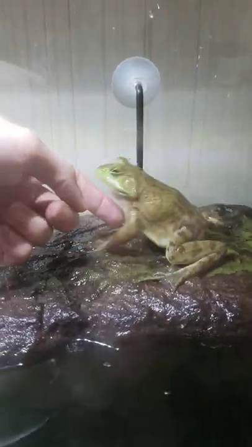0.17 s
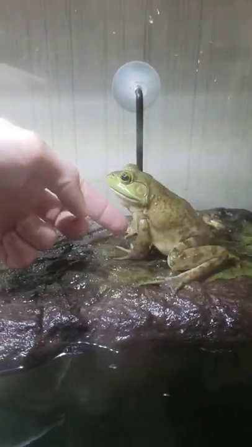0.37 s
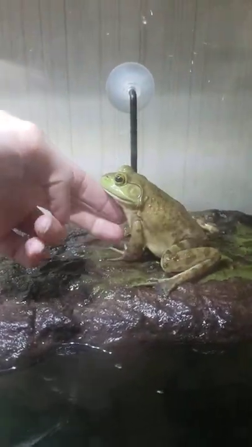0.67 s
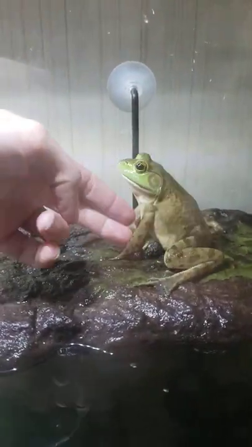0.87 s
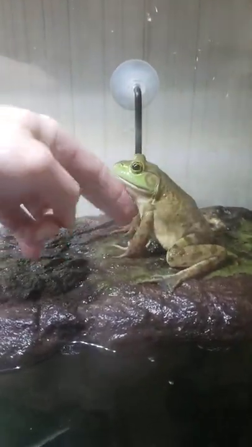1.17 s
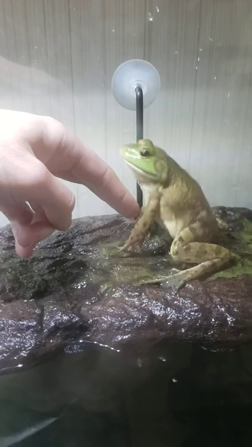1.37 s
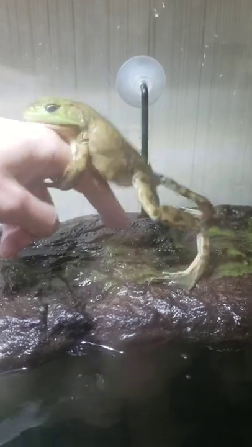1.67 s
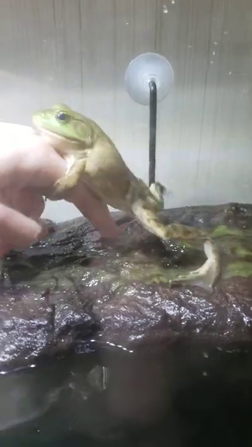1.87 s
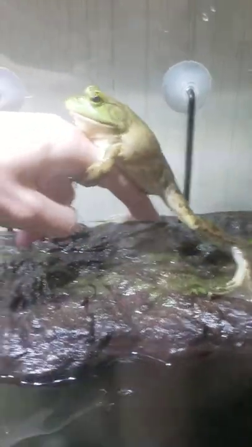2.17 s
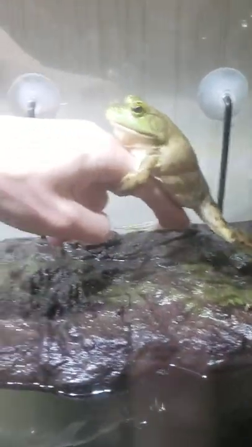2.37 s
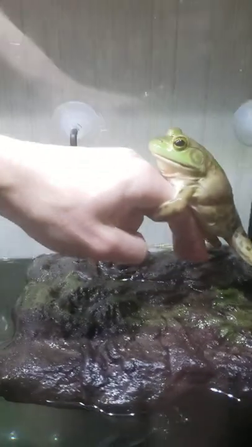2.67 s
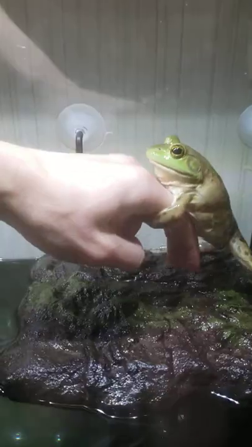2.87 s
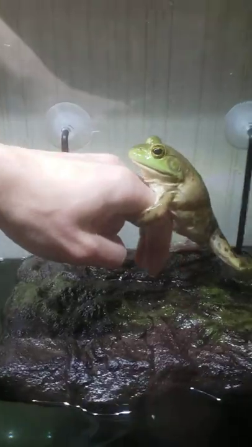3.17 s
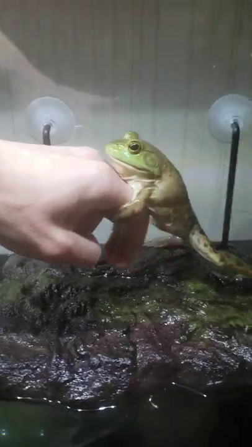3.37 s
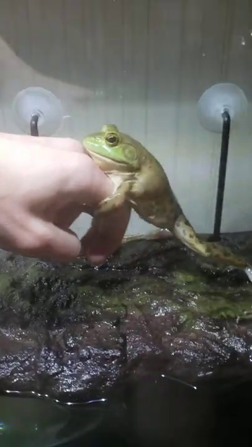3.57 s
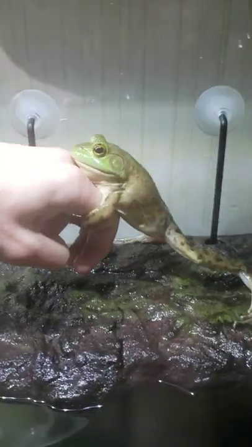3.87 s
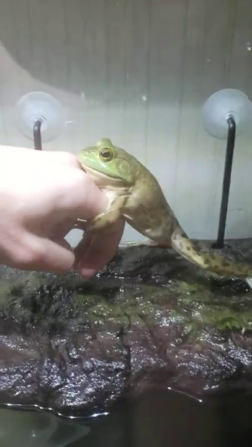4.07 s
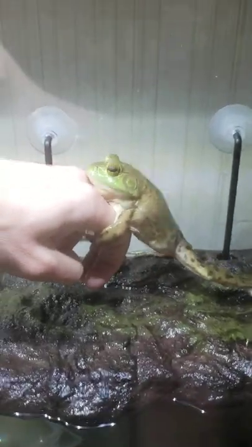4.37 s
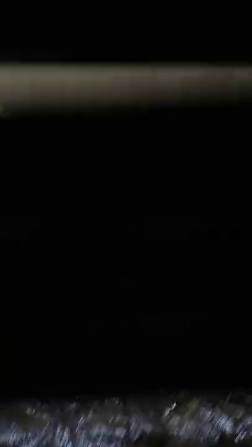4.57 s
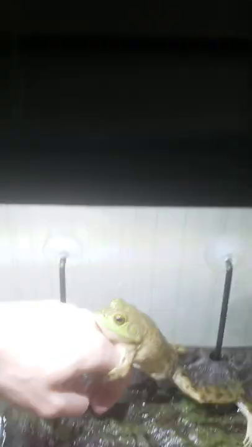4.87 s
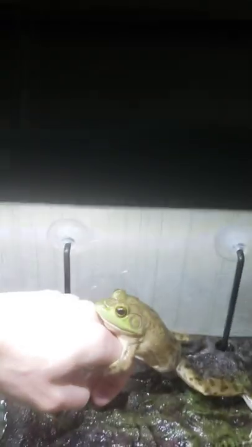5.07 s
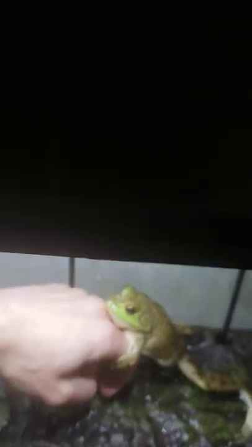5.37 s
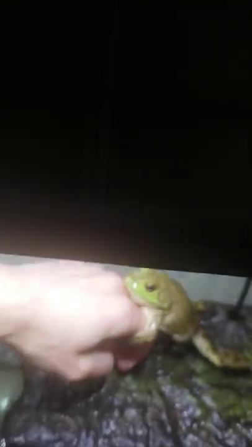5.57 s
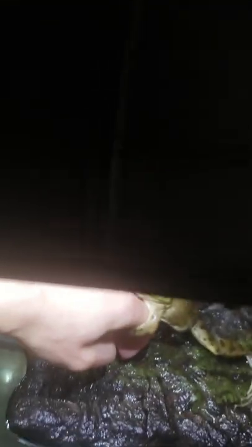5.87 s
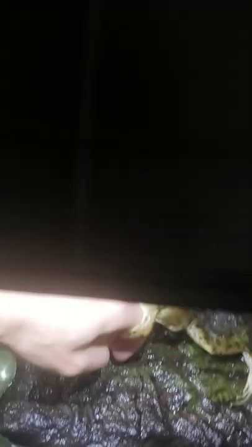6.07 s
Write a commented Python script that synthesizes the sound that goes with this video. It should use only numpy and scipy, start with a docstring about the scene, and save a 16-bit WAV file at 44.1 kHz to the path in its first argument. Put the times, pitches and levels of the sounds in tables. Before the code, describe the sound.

Over low tank hum, wet skin smacks softly, a frog barks one loud pitched croak, then rattles in stuttering runs until the end.

```python
"""Bullfrog in a glass tank

A bullfrog lifted on a hand gives one short, loud croak: unsteady cord pulses and puffs through a throat.
A long buzzing rattle of single pops follows, crisper as the microphone rises past the tank's rim.
Wet skin smacks, brushes and squeaks as shaped noise; bumps ring low modes and a drop blips.
A pump hums in wavering sines, over rumble, thin hiss and a high whine, in a small live room.
"""
import sys
import numpy as np
from scipy import signal
from scipy.fft import rfft, irfft
from scipy.io import wavfile

SR = 44100
rng = np.random.default_rng(int(sys.argv[2]) if len(sys.argv) > 2 else 0)


def to_wav(s):
    """Save 16-bit WAV."""
    ch = np.atleast_2d(s).T  # columns
    pcm = np.round(np.clip(ch, -1, 1) * 32767)  # PCM
    wavfile.write(sys.argv[1], SR, pcm.astype(np.int16))


N = 273684


def croak(jitter=0.064, puff_gain=8.2, source_tilt=0.28, rasp_hz=1900, ear_lag_s=0.000095):
    """Fast, unsteady pulses of the vocal cords and puffs of air sound through the throat."""
    # a hard push keeps the croak clean; it frays as the air runs out and ends in a soft hoot:
    # start_s, effort_db, roughness (0-1), rasp_db
    course = [(1.923, -47.5, 0.3, 0.5), (1.945, -42, 0.3, -1), (1.959, -25.5, 0, 1), (1.97, -34, .28, 1.5),
              (1.981, -27, 0.2, 4.5), (1.998, -20, 0.07, 0), (2.016, -30.5, 0.37, 3.5),
              (2.05, -28.5, 0.28, -5.5), (2.075, -33, .45, -4), (2.096, -49, 0.53, -9),
              (2.116, -35, 0.19, -9), (2.187, -43, .06, -19), (2.215, -61, 0.2, -22)]
    # the pitch scoops up as the cords tighten, then holds: start_s, pitch_hz
    pitch = [(1.923, 428), (1.95, 456), (2.0, 482), (2.11, 482), (2.21, 474)]
    # throat resonances: frequency_hz, gain_db
    throat = [(150, -15), (330, -9), (465, 7.5), (600, -12), (800, -3), (970, 7), (1150, -6.5), (1420, -4),
              (1640, -9), (2100, -8.5), (2340, -5.5), (2600, -18), (3200, -26.5), (3700, -34), (4900, -40),
              (6200, -29), (7700, -38.5), (9000, -91)]
    # the bass comes straight, the treble by way of the walls: frequency_hz, direct_db, room_db
    paths = [(486, -1.5, -10.5), (950, -4.5, -9), (1630, -13.5, -1)]
    # stereo balance: frequency_hz, left_minus_right_db
    balance = [(480, 0.5), (960, 4.5), (1400, 1.5), (2200, -2.5), (4000, -9.5), (7000, 8.5)]
    tighten_s = 0.047
    # the octave rings out when tight cords are pushed hard
    octave_slack_db, octave_full_db = -12.5, 5.5

    s, *controls = np.transpose(course)
    t = np.arange(0, s[-1] - s[0], 1 / SR)
    effort_db, rough, rasp_db = (np.interp(s[0] + t, s, control) for control in controls)
    hz = np.interp(s[0] + t, *np.transpose(pitch))
    turns = np.cumsum(hz * (1 + jitter * rough * wander(len(t), 200))) / SR

    tension = np.sin(np.pi / 2 * np.minimum(t / tighten_s, 1)) ** 2
    push = np.sqrt(amp(effort_db - effort_db.max()))
    octave = amp(octave_slack_db + (octave_full_db - octave_slack_db) * tension * push)
    cords = np.zeros(len(t))
    for k in range(1, 16):
        harmonic = np.sin(2 * np.pi * k * turns) / k ** source_tilt
        cords += (octave if k == 2 else 1) * harmonic

    # each cycle starts with the strongest breath
    puffs = unit((0.25 + np.exp(-(turns % 1) / 0.6)) * rng.standard_normal(len(t)))
    voice = unit(colour(unit(cords) + puff_gain * rough * puffs, throat))
    rasp = signal.sosfiltfilt(signal.butter(3, rasp_hz, "high", fs=SR, output="sos"), voice)
    edges = signal.windows.tukey(len(t), .05)
    call = edges * amp(effort_db) * (voice + (amp(rasp_db) - 1) * rasp)

    # the direct sound reaches the right ear first
    dry = np.zeros((2, N))
    add(dry[0], s[0] + ear_lag_s, call)
    add(dry[1], s[0], call)
    direct = colour(dry, [(f, db) for f, db, _ in paths])
    scattered = room(colour(dry[0], [(f, db) for f, _, db in paths]))
    heard = direct + scattered + glass(dry[0])
    return irfft(rfft(heard) * sides(read(balance, np.fft.rfftfreq(N, 1 / SR))), N)


def glass(x):
    """The ringing between the glass walls; the two ears catch each resonance a quarter cycle apart."""
    # what the croak leaves ringing: frequency_hz, t60_s, gain_db
    resonances = [(440, 0.2, 2.5), (909, .3, 3), (1333, 0.13, 9.5), (1483.5, .35, 13), (2310, 0.34, 3)]
    t = np.arange(SR // 2) / SR
    modes = np.zeros(len(t), complex)
    for hz, t60, db in resonances:
        # makes db the gain at the resonance, however long it rings
        scale = 2 * np.log(1000) / (t60 * SR)
        modes += amp(db - 60 * t / t60) * scale * np.exp(2j * np.pi * hz * t)
    return convolve(x, np.array([modes.real, modes.imag]))


def rattle(slip_s=0.00028, uneven_db=2.02, pulse_hz=660, pulse_s=0.00093, pan_db=7, room_db=-8.0,
           ring_db=-13.0, room_pan_db=3, treble_hz=2200, rasp_db=-75, rasp_s=0.0055):
    """Slack cords pop open one pulse at a time, in runs with short hitches between them."""
    # unbroken runs: first_pulse_s, last_pulse_s, push_db
    runs = [(3.481, 3.54, -38), (3.57, 3.604, -35), (3.635, 3.726, -39.5), (3.776, 3.913, -35),
            (3.959, 4.107, -37.5), (4.151, 4.299, -36), (4.345, 4.493, -35), (4.54, 4.747, -35.5),
            (4.787, 4.874, -36.5), (4.906, 4.941, -33), (4.989, 5.021, -31), (5.071, 5.131, -31.5),
            (5.191, 5.191, -30), (5.275, 5.308, -31.5), (5.357, 5.512, -32.5), (5.54, 5.715, -32),
            (5.774, 5.774, -30.5), (5.825, 5.94, -31.5), (5.954, 6.012, -34), (6.037, 6.186, -32)]
    # the pops as tank and room scatter them: frequency_hz, gain_db
    scatter_colour = [(120, -30.5), (300, -33.5), (450, 6), (570, 4.5), (780, -3.5), (970, -9.5),
                      (1130, -14), (1400, -14.5), (1700, -17), (2000, -19), (2700, -12), (5000, -52),
                      (7600, -18.5), (11000, -36.5)]
    # the rasp of a single pop: frequency_hz, gain_db
    pop_rasp = [(700, -9), (1400, 13), (2700, -1.5), (4300, -11), (9500, -28)]
    # nearby hard surfaces: delay_s, left_gain, right_gain
    reflections = [(.0048, -0.092, -0.16), (.0067, -0.38, 0.06), (.0126, 0.52, 0.0036), (.017, 0.47, -0.18)]
    # standing waves the pops keep ringing: frequency_hz, t60_s, mic_low_db, mic_high_db
    standing_waves = [(586, 1, -7, 6.5), (638, 0.36, 9, -18), (733, 0.38, 3.5, -4), (930, 0.41, 3, 4.5),
                      (1010.5, 0.84, -3, -1), (1173, 0.22, -12, -35), (1350, 0.096, -12, -49),
                      (1680, 0.2, -22, -19.5), (2565, 0.057, -23, -38)]
    # the direct path opens up as the microphone clears the rim: start_s, level_db
    direct_path = [(3.5, -11.5), (4.6, -7.5), (4.95, -4.5), (6.2, 1)]
    pulses_per_s, run_swell_db = 33, 0.8  # the push swells in the middle of each run
    treble_low_db, treble_high_db = -14, -5.5  # microphone low and high

    pops = np.zeros(N)
    for first, last, run_db in runs:
        times = np.linspace(first, last, round((last - first) * pulses_per_s) + 1)
        push_db = run_db + run_swell_db * np.sin(np.linspace(0, np.pi, len(times)))
        chance = rng.standard_normal((len(times), 2))
        for s, db, (slip, size) in zip(times, push_db, chance):
            add(pops, s + slip_s * slip, amp([db + uneven_db * size]))

    # each pop is a smooth swing of barely two cycles
    u = np.arange(-256, 257) / SR
    pulse = -np.exp(-.5 * (u / pulse_s) ** 2) * np.sin(2 * np.pi * pulse_hz * u)
    direct = signal.fftconvolve(pops, pulse, "same")
    opening = amp(np.interp(np.arange(N) / SR, *np.transpose(direct_path)))
    out = sides(pan_db) * direct * opening
    for delay, left, right in reflections:
        add(out, delay, np.array([[left], [right]]) * direct)

    scattered = convolve(pops, ring(scatter_colour))[0]
    t = np.arange(SR // 2) / SR
    waves = 0
    for hz, t60, low_db, high_db in standing_waves:
        mode = np.exp(-np.log(1000) * t / t60) * np.sin(2 * np.pi * hz * t)
        waves = waves + lifted(low_db, high_db, bend=0.72) * unit(convolve(pops, mode))
    waves = np.std(scattered) * waves  # level follows the scattered sound before its treble moves
    high_pass = signal.butter(2, treble_hz, "high", fs=SR, output="sos")
    treble = signal.sosfiltfilt(high_pass, scattered)
    bright = scattered + (lifted(treble_low_db, treble_high_db, bend=1.0) - 1) * treble
    waves *= np.std(bright) / np.std(scattered)  # and then keeps step with it

    # each pop ends in a soft, brief rasp
    bursts = convolve(pops, t / rasp_s * np.exp(-t / rasp_s)) * rng.standard_normal((2, N))
    out += amp(rasp_db) * unit(colour(bursts, pop_rasp)) * opening
    return out + sides(room_pan_db) * (amp(room_db) * room(bright) + amp(ring_db) * waves)


def skin(room_db=-3, direct_db=-2):
    """Wet skin unsticks in brief smacks and slides in soft swells."""
    # skin unsticking from skin and wood, levels ahead of the direct and room paths:
    # start_s, level_db, t60_s, tilt_db_per_octave, air_pocket_hz
    smacks = [(0.704, -66.5, 0.14, 4, 5000), (2.206, -54.5, 0.18, 3, 4300), (2.464, -66, 0.058, 5.5, 5000),
              (2.635, -65.5, 0.15, 0.5, 4160), (3.601, -50, 0.12, -7, 3380), (3.613, -51.5, 0.11, 5, 5200),
              (4.022, -63, 0.021, 2, 3660), (5.82, -51, 0.012, -15, 2500)]
    # the hand brushing past, levels likewise:
    # start_s, length_s, level_db, tilt_db_per_octave, squeak_hz, squeak_db
    brushes = [(0.798, 0.086, -62.5, 1.5, 3230, 10.5), (4.42, 0.37, -72, 8, 6800, 6.5),
               (4.747, 0.3, -73.5, 8, 3880, 14), (5.024, 0.053, -62, 2, 2700, 0),
               (5.224, 0.11, -52, 0.5, 3730, 4), (5.5, 0.078, -61, -5, 2700, -4),
               (5.659, 0.14, -63, -4.5, 3520, 5.5)]
    smack_rise_s = 0.0048
    pocket_width_hz, pocket_db = 940, 2  # the air trapped in a smack
    squeak_width_hz = 260

    t, dry = np.arange(SR // 2) / SR, np.zeros((2, N))
    for s, db, t60, tilt_db, pocket_hz in smacks:
        fall = np.exp(-np.log(1000) * np.maximum(t - smack_rise_s, 0) / t60)
        shape = np.minimum(t / smack_rise_s, 1) * fall
        noise = skin_noise(len(t), tilt_db, pocket_hz, pocket_db, pocket_width_hz)
        add(dry, s, amp(db) * shape * noise)
    for s, length, db, *timbre in brushes:
        swell = np.sin(np.pi * np.minimum(t / length, 1))
        add(dry, s, amp(db) * swell * skin_noise(len(t), *timbre, squeak_width_hz))
    return amp(direct_db) * dry + amp(room_db) * room(dry)


def skin_noise(size, tilt_db, peak_hz, peak_db, width_hz, grain_db=4):
    """The grainy hiss of wet skin, with one resonance where it squeaks or traps air; rms 1."""
    # basic timbre: frequency_hz, gain_db
    skin_colour = [(500, 9.5), (1900, -0.5), (2550, 6.5), (4000, 0.5), (4500, -5.5), (5400, -8.5),
                   (7300, -9), (8300, -20), (9200, -26), (11500, -19.5), (15000, -20.5)]
    # stereo balance: frequency_hz, left_minus_right_db
    balance = [(1000, 0), (2900, -8), (5200, -2), (7600, 18.5), (14000, -3)]
    hz = np.fft.rfftfreq(size, 1 / SR)
    grains = rng.standard_normal((2, size)) * amp(grain_db * wander(size, 385))
    # the boost in dB halves at width_hz from its peak
    peak = peak_db / (1 + ((hz - peak_hz) / width_hz) ** 2)
    tilt = tilt_db * np.log2(np.maximum(hz, 2000) / 2000)  # above 2 kHz only
    timbre = amp(read(skin_colour, hz) + peak + tilt)
    return unit(irfft(rfft(grains) * timbre * sides(read(balance, hz)), size))


def drop(pan_db=-9, room_db=-5):
    """A drop lands with one tiny, pitched blip."""
    start_s, pitch_hz, rise_s, level_db = 3.0765, 2850, 0.0008, -55  # level ahead of pan and room
    t, dry = np.arange(SR // 10) / SR, np.zeros(N)
    shape = t / rise_s * np.exp(1 - t / rise_s)
    add(dry, start_s, amp(level_db) * shape * np.sin(2 * np.pi * pitch_hz * t))
    return sides(pan_db) * (dry + amp(room_db) * room(dry))


def bumps(rise_s=0.027, spread=0.069):
    """A soft push sets a few close low modes of the tank ringing."""
    # soft bumps of hand and frog: start_s, level_db, pitch_hz
    pushes = [(0.236, -49, 169), (1.631, -47.5, 176.3), (2.269, -45.5, 168.8)]
    t, out = np.arange(SR // 3) / SR, np.zeros(N)
    shape = t / rise_s * np.exp(1 - t / rise_s)
    for s, db, hz in pushes:
        modes = sum(np.sin(2 * np.pi * (hz * (1 + spread * k) * t + rng.random())) for k in (-1, 0, 1))
        add(out, s, amp(db) * unit(modes) * shape)
    return out


def pump(waver_hz=1.227, flutter=0.15):
    """A motor hum whose lines waver slightly in pitch and level."""
    # hum lines: pitch_hz, level_db (rms)
    hum = [(61, -67.5), (119.8, -57), (240, -66), (295, -62), (360, -59)]
    lines = np.zeros(N)
    for hz, db in hum:
        level = amp(db) * (1 + flutter * wander(N, 1.7))
        turns = np.cumsum(hz + waver_hz * wander(N, 3.4)) / SR
        lines += level * np.sin(2 * np.pi * turns)
    return np.sqrt(2) * lines * sides(0.51)


def air(level_db=-50, boom_hz=185, boom_octaves=0.17):
    """Low rumble under a thin hiss; the part that booms inside the tank follows the microphone."""
    # steady air and machinery: frequency_hz, relative_level_db
    spectrum = [(20, -40), (36, -16), (55, 5), (90, -1.5), (180, -4.5), (370, -7), (520, -16.5), (750, -17),
                (1150, -37.5), (2800, -39), (5500, -48), (7200, -46), (8300, -59.5), (12500, -48),
                (16000, -49)]
    # stereo balance: frequency_hz, left_minus_right_db
    balance = [(50, 7), (300, -3.5), (1000, 6.5), (3000, -5), (9000, 4.5)]
    boom_low_db, boom_high_db = 3, -2.5  # microphone low and high
    hz = np.fft.rfftfreq(N, 1 / SR)
    noise = irfft(diffuse(N) * amp(read(spectrum, hz)) * sides(read(balance, hz)), N)
    steady = amp(level_db) * unit(noise)
    boom_band = np.exp(-.5 * (np.log2((hz + 1) / boom_hz) / boom_octaves) ** 2)
    boom = irfft(rfft(steady) * boom_band, N)
    return steady + boom * (lifted(boom_low_db, boom_high_db, bend=1.35) - 1)


def whine(hz=14900, width_hz=140, low_db=-113, high_db=-80.5):
    """A narrow, high hiss that grows as the microphone nears the lamp."""
    f = np.fft.rfftfreq(N, 1 / SR)
    band = irfft(rfft(rng.standard_normal((2, N))) / (1 + ((f - hz) / width_hz) ** 2), N)
    return unit(band) * lifted(low_db, high_db, bend=0.98)


def room(x, build_s=0.0048):
    """A diffuse tail for each ear, every band dying at its own speed; as loud as the source."""
    # decay of the room: frequency_hz, t60_s
    decay = [(200, 1), (500, 0.39), (1000, 0.43), (2300, 0.31), (6000, 0.32), (14000, 0.23)]
    hz, t, z = signal.stft(irfft(diffuse(SR // 2)), SR, nperseg=256)
    z *= amp(-60 * t / read(decay, hz)[:, None])
    tail = signal.istft(z * (1 - np.exp(-t / build_s)), SR, nperseg=256)[1]
    return np.array([unit(side) for side in convolve(x, tail)]) * np.std(x)


def diffuse(size):
    """Spectra of noise from all sides: bass alike in both ears, treble nearly unrelated."""
    # likeness of the ears: frequency_hz, left_right_correlation (0-1)
    likeness = [(50, 1), (400, 0.69), (600, 0.42), (1000, 0.028), (8000, 0.088)]
    left, other = rfft(rng.standard_normal((2, size)))
    same = np.clip(read(likeness, np.fft.rfftfreq(size, 1 / SR)), -1, 1)
    return np.array([left, same * left + np.sqrt(1 - same ** 2) * other])


def lifted(low_db, high_db, bend):
    """A gain that moves as the microphone rises past the rim; a bend under 1 comes early, over 1 late."""
    rise_from_s, rise_to_s = 3.72, 5.6
    height = np.interp(np.arange(N) / SR, [rise_from_s, rise_to_s], [0, 1])
    return amp(low_db + (high_db - low_db) * height ** bend)


def amp(db):
    """Decibels to gain."""
    return 10 ** (np.asarray(db) / 20)


def unit(x):
    """Scales to rms 1."""
    return x / np.sqrt(np.mean(x ** 2) + 1e-20)


def sides(db):
    """Left and right gains for a left-right difference."""
    return amp(np.array([[.5], [-.5]]) * db)


def read(points, hz):
    """Reads a spectrum on a log-frequency axis."""
    f, value = np.transpose(points)
    return np.interp(np.log(hz + 1), np.log(f), value)


def add(mix, s, sound):
    """Mixes a sound in at time s."""
    part = mix[..., round(s * SR):][..., :sound.shape[-1]]
    part += sound[..., :part.shape[-1]]


def wander(size, hz):
    """Smooth random drift, mostly slower than hz; rms 1."""
    f = np.fft.rfftfreq(size, 1 / SR)
    return unit(irfft(rfft(rng.standard_normal(size)) * np.exp(-(f / hz) ** 2), size))


def ring(points, size=2048):
    """The causal (minimum-phase) response of a body with this spectrum, peak 1."""
    log_gain = np.log(amp(read(points, abs(np.fft.fftfreq(size, 1 / SR)))))
    response = np.fft.ifft(np.exp(np.conj(signal.hilbert(log_gain)))).real[:size // 2]
    return response / abs(response).max()


def convolve(x, response):
    """Filters a sound by a response, cut at the length of the scene."""
    return signal.fftconvolve(np.atleast_2d(x), np.atleast_2d(response), axes=1)[:, :N]


def colour(x, points):
    """Filters a sound by a spectrum."""
    gain = amp(read(points, np.fft.rfftfreq(x.shape[-1], 1 / SR)))
    return irfft(rfft(x) * gain, x.shape[-1])


def scene():
    """The frog and the hand over the steady sound of the tank."""
    return croak() + rattle() + skin() + drop() + bumps() + pump() + air() + whine()


def record(dry, edge_hz=15750):
    """The recorder's band limit, a steep low-pass."""
    low_pass = signal.firwin(511, edge_hz, window=("kaiser", 9), fs=SR)
    return signal.oaconvolve(dry, low_pass[None], "same")


dry = scene()
out = record(dry)
to_wav(out)
```